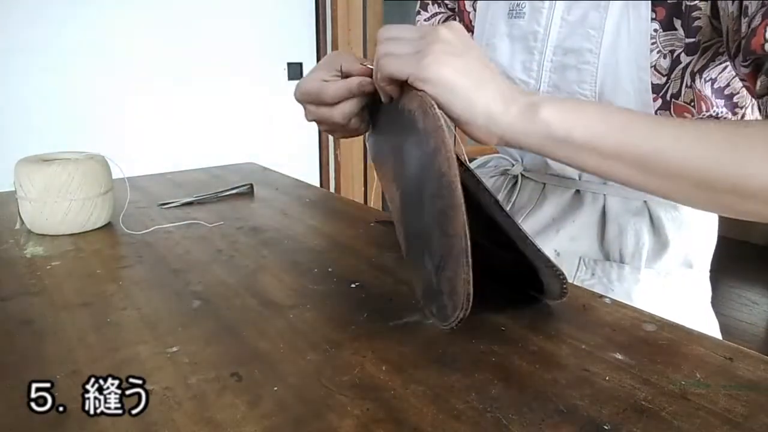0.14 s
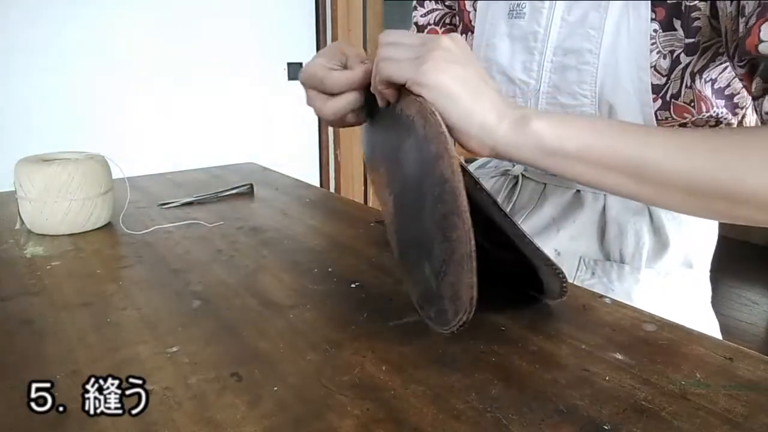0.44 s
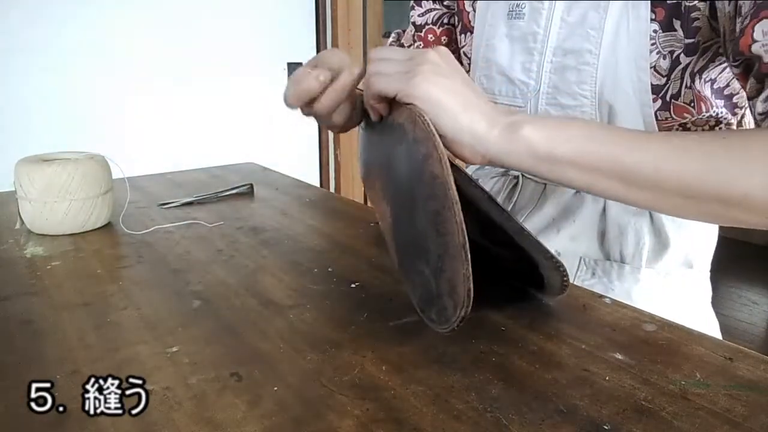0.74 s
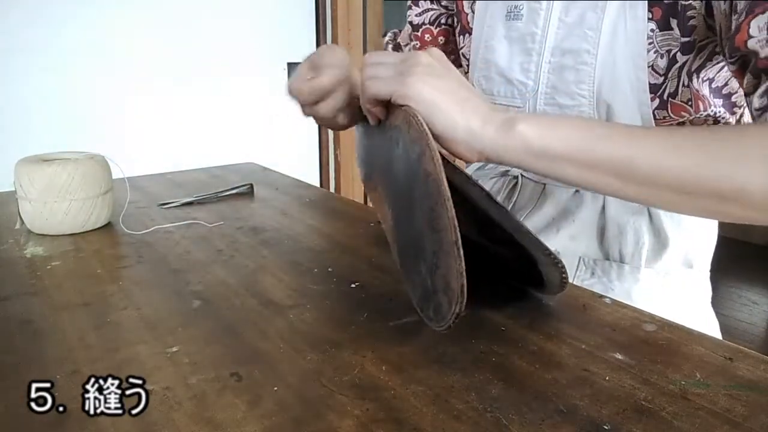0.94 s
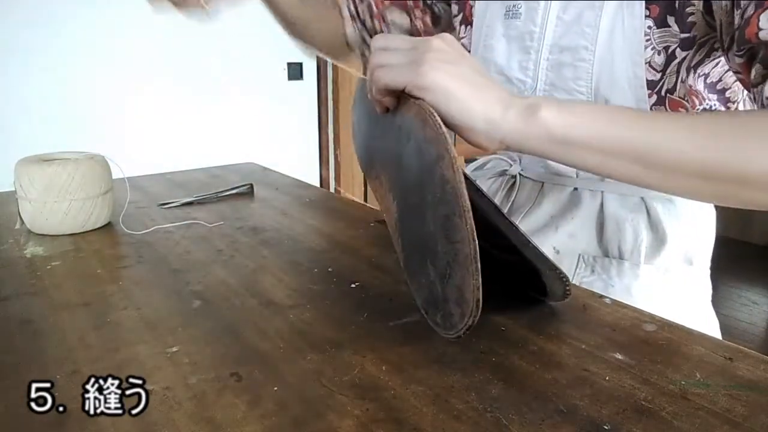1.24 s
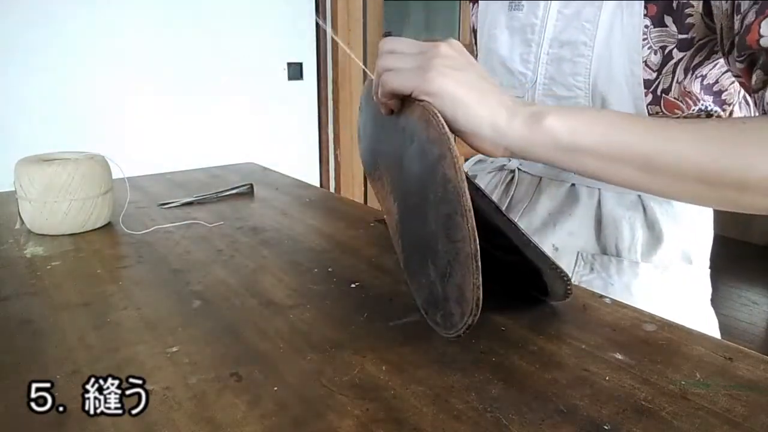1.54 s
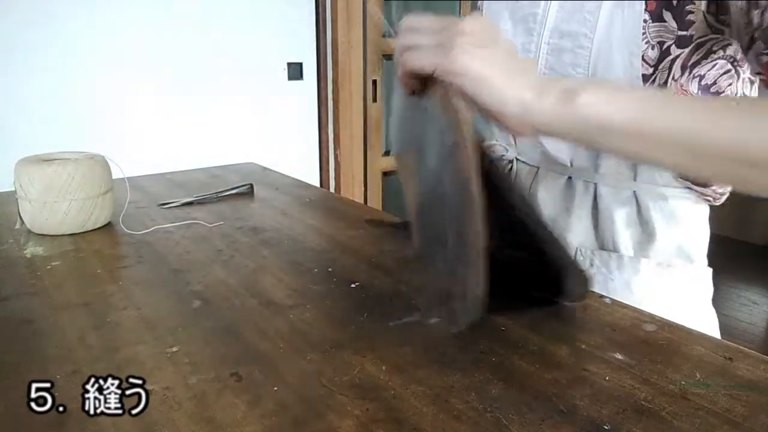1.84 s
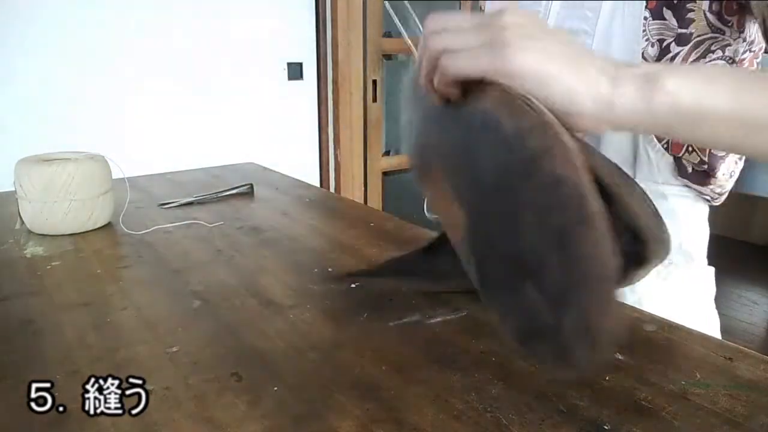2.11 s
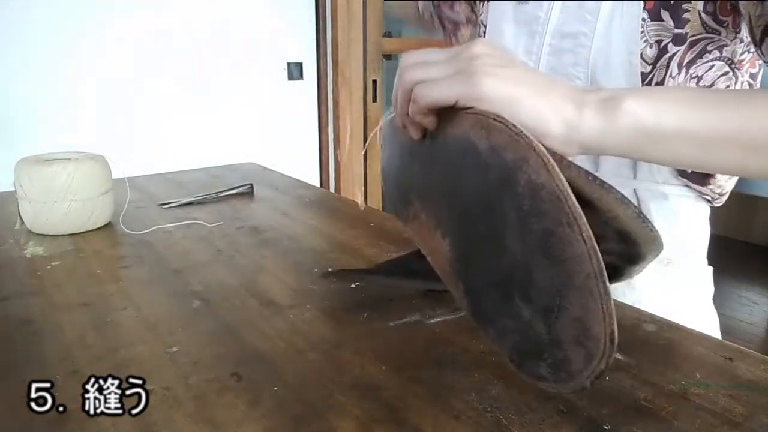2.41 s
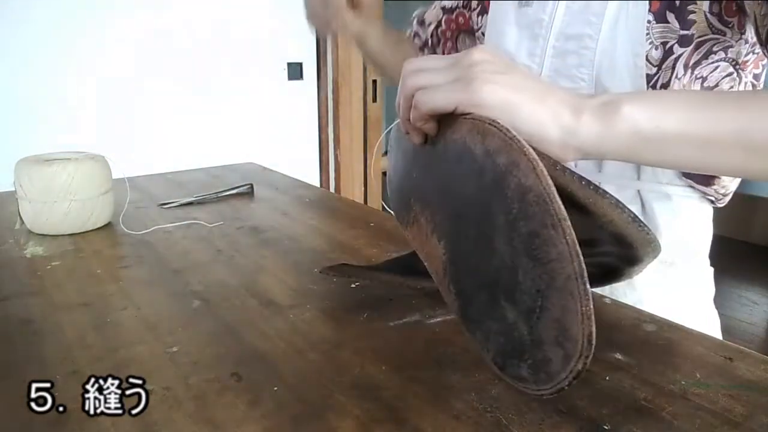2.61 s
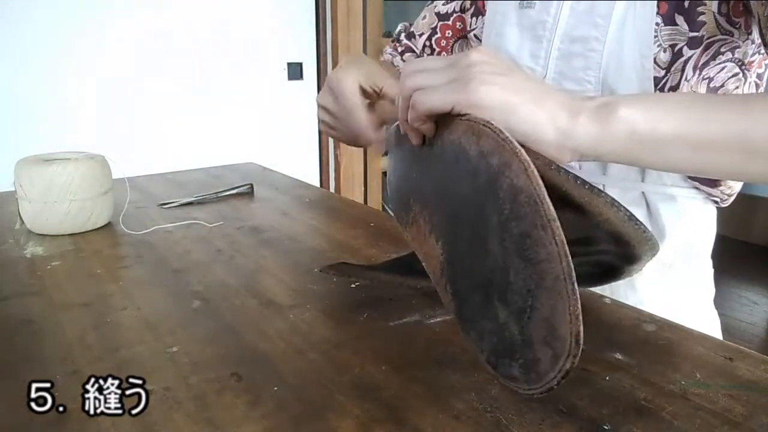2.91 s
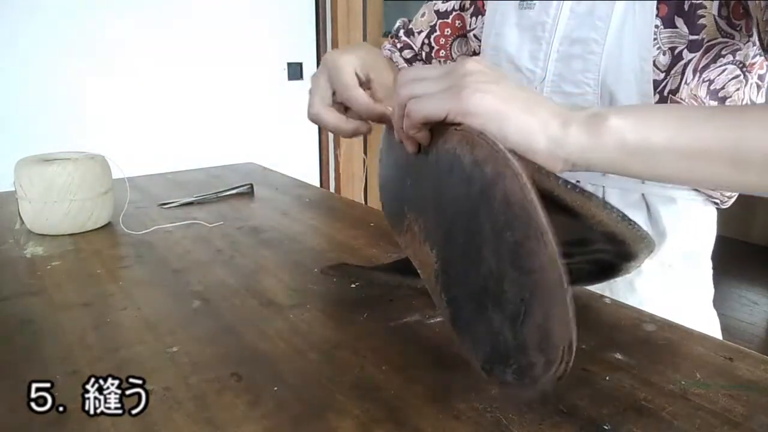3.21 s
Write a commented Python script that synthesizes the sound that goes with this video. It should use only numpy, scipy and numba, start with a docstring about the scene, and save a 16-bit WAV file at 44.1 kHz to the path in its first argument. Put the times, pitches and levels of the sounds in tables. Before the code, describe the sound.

A long thread hisses and rasps through leather after a brief needle scrape. The leather then scuffs and knocks on a wooden table, with small fingernail ticks, picked up in stereo in a small, quiet room.

```python
"""A long thread hisses and rasps through leather, stitched by hand at a wooden table in a small, quiet room.
The needle scrapes through the tight hole and ticks along with the fingernails. The piece scuffs over the
wood, crackles as it flexes, thumps the boards and clacks on them with its hard edge. A pair of microphones
takes it in with the room's short reverberation, the table's rumble under the hands and faint room tone."""
import sys
import numpy as np
from scipy import signal
from scipy.fft import rfft, irfft
from scipy.io import wavfile
from scipy.ndimage import uniform_filter1d
from numba import njit

SR = 44100
rng = np.random.default_rng(int(sys.argv[2]) if len(sys.argv) > 2 else 0)


def wrap_up_sound(samples):
    """Save the sound to the file named by the first command line argument, as 16-bit audio."""
    columns = np.atleast_2d(samples).T
    # keep every value between -1 and 1, then stretch to whole-number steps
    tamed = np.clip(columns, -1, 1)
    steps = np.round(tamed * 32767).astype(np.int16)
    wavfile.write(sys.argv[1], SR, steps)


N = 147735

# The empty room. Each row: frequency in Hz, relative level in dB.
ROOM_TONE_SPECTRUM = [(20, 1), (32, -12), (50, -0.5), (80, -24), (130, -17), (200, -30), (350, -23.5),
                      (520, -22.5), (800, -27.5), (1600, -31.5), (4000, -33), (8000, -32), (11000, -34),
                      (15500, -35.5)]
# The table under the working hands. Each row: frequency in Hz, relative level in dB.
RUMBLE_SPECTRUM = [(20, 7.5), (50, -4.5), (90, 6.5), (140, 1.5), (170, -4.5), (225, -5.5), (320, -11),
                   (420, -37.5), (900, -22.5)]
# That rumble rising and falling. Each row: time in seconds, level in dB.
RUMBLE_LEVELS = [(0, -55.5), (.25, -57.5), (.37, -53), (.6, -52.5), (.82, -57.5), (1.1, -52), (1.3, -48.5),
                 (1.55, -45.5), (1.68, -57.5), (1.95, -52), (2.18, -48), (2.35, -53.5), (2.8, -58.5),
                 (2.95, -49.5), (3.1, -54.5), (3.35, -48.5)]
# Leather bumping the table. Each row: time in seconds, level in dB, half width of the push in ms.
BUMPS = [(0.2809, -17, 1.29), (.372, -28.5, 2.15), (.510, -28.5, 1.56), (0.542, -21.5, 4.2),
         (0.625, -38, 0.94), (0.962, -23, 2.62), (1.018, -25.5, 1.41), (1.214, -43.5, 0.18),
         (1.292, -32.5, 1.94), (1.335, -32, 1.83), (1.447, -34.5, 1.2), (1.535, -30, 1.32),
         (2.2125, -17.5, 2.04), (2.895, -35, 1.9), (3.1855, -8.5, 0.37)]
# The table top's modes. Each row: frequency in Hz, level in dB, seconds to fall 60 dB.
TABLE_TOP_MODES = [(47.9, -21.5, 0.48), (73, -20, 0.15), (92.2, -8.5, 0.14), (114.5, -10, 0.11),
                   (136.4, 2.5, 0.13), (173, -9, 0.098), (199.5, -10, 0.18), (228.8, -11.5, 0.23),
                   (258, -21, 0.29), (286.5, -34.5, 0.37), (333, -26.5, 0.27), (460, -25, 0.12),
                   (525, -16.5, 0.062), (836, -2.5, 0.03)]
# Its crowded upper modes. Each row: frequency in Hz, relative level in dB.
UPPER_RING_SPECTRUM = [(100, -14), (230, 7), (400, -24.5), (470, -3), (600, 4.5), (660, -18), (760, -5),
                       (850, 4), (930, 2), (1000, -8), (1350, -1), (1600, -22), (4000, -46)]
# Needle, nails, tugged thread and stiff leather ticking.
# Each row: start in seconds, snap level in dB, body level in dB, body pitch in Hz, decay time in ms.
TICK_EVENTS = [(.281, -52.5, -49.5, 740, 4.2), (1.213, -53, -41, 238, 10), (2.056, -55, -44, 740, 3.5),
               (2.132, -50, -43, 900, 6), (2.2071, -39.5, -40.5, 2780, 1.5), (2.2165, -46, -48, 1200, 2.3),
               (2.3613, -49.5, -72, 1100, 2.3), (2.3763, -41.5, -36.5, 970, 3.7),
               (2.429, -50.5, -41.5, 920, 4.7), (2.8933, -44, -39, 910, 2.7), (2.96, -50.5, -48, 770, 11),
               (3.024, -44.5, -45.5, 8000, 4.7), (3.182, -47, -49, 4800, 3), (3.308, -41, -49, 800, 1.2),
               (3.3160, -41, -34, 4500, 1.3), (3.328, -35.5, -58, 800, 1.1)]
# A tick's bright snap. Each row: frequency in Hz, relative level in dB.
SNAP_SPECTRUM = [(400, -29), (1500, -7), (3000, 3), (5000, 7.5), (8000, 12), (11000, -8), (16000, -16)]
# Needle pushed through the leather.
# Each row: start and length in seconds, level in dB, squeak pitch in Hz, squeak against hiss in dB.
NEEDLE_SCRAPES = [(0.41, 0.091, -54.5, 5140, -3), (.472, 0.032, -56, 6800, -15),
                  (0.508, 0.041, -54.5, 3630, -3)]
# Thread running through the hole. Each row: time in seconds, level in dB.
PULL_LEVELS = [(.89, -67), (.94, -55.5), (.965, -51), (1.12, -53.5), (1.25, -50), (1.32, -46.5),
               (1.52, -48.5), (1.75, -48.5), (1.90, -52.5), (2.04, -54), (2.13, -69), (2.18, -74),
               (2.5, -61), (2.8, -86)]
# The thread running taut with a broad hiss. Each row: start and length in seconds, level in dB.
TAUT_TUG = [(1.93, 0.18, -52.5)]
# Fingers sliding on thread and needle. Each row: start and length in seconds, level in dB.
FINGER_SLIDES = [(2.93, 0.075, -60), (3.01, 0.064, -60.5), (3.28, 0.073, -51.5)]
# The hiss of the fibres. Each row: frequency in Hz, relative level in dB.
THREAD_SPECTRUM = [(200, 0), (700, 1), (950, -2.5), (1150, -4.5), (1600, -3), (2700, -3.5), (4200, -2),
                   (5500, -4), (6700, -0.5), (9500, -3), (10600, -7.5), (12200, -4.5), (14000, -18),
                   (16000, -28)]
# The rasp of the plies. Each row: centre in Hz, width in Hz, level against the pull in dB.
PLY_BANDS = [(3770, 1400, -9.5), (7920, 3800, -4)]
# Leather scuffing over the wood. Each row: start and length in seconds, level in dB.
SCUFF_STROKES = [(1.2, 0.76, -59.5), (1.76, 0.35, -53.5), (2.03, 0.13, -48.5), (2.17, 0.072, -51),
                 (2.23, 0.6, -57), (2.885, 0.16, -57.5), (3.10, 0.016, -53.5), (3.26, 0.094, -49)]
# The dull tone of a scuff. Each row: frequency in Hz, relative level in dB.
SCUFF_SPECTRUM = [(100, -3.5), (200, 5), (290, 9.5), (400, -2.5), (560, 7), (800, -2.5), (1200, -4.5),
                  (1700, -14), (3000, -11), (4000, -20), (8000, -14.5), (15000, -33)]
# Leather flexing in the hand. Each row: start and length in seconds, level in dB.
FLEXES = [(1.85, 0.23, -59), (2.38, 0.35, -62), (2.945, 0.052, -55.5), (3.10, 0.023, -56.5)]
# The dry tone of its crackle. Each row: frequency in Hz, relative level in dB.
RUSTLE_SPECTRUM = [(200, -18), (500, 1), (1100, 2.5), (1600, -1.5), (2500, -1), (4500, -13.5), (7500, -2.5),
                   (11000, -14.5), (16000, -20)]
# The hard edge striking wood. Each row: time in seconds, level in dB, half width of the push in ms.
EDGE_STRIKES = [(2.196, -45, 0.19), (2.2082, -33.5, 0.056), (2.2178, -39.5, .08), (3.187, -33.5, 0.13)]
# The stiff leather panel's modes. Each row: frequency in Hz, level in dB, seconds to fall 60 dB.
LEATHER_MODES = [(753, 0, 0.023), (884, -1, 0.027), (1373, -7, 0.031), (2720, -5, 0.016)]
# Balance of the microphone pair. Each row: frequency in Hz, left minus right in dB.
PAIR_BALANCE = [(30, -1), (70, -2.5), (130, -1.8), (300, -2.4), (520, 0.5), (1000, -2.5), (2000, -0.5),
                (4000, -2), (6300, -1.4), (8200, 2), (11000, -0.5), (15000, -.5)]

ROOM_T60_S, ROOM_GAP_S, WIDE_ABOVE_HZ = 0.38, 0.0038, 550
FIBRE_GRAIN = dict(per_s=5000, spread_db=3, flutter_db=2.65)  # shared by needle and thread


def undb(db):
    """Decibels to gain."""
    return 10 ** (np.asarray(db) / 20)


def unit(x):
    """Scale to rms 1."""
    return x / np.sqrt(np.mean(x ** 2))


def times():
    """Time of each sample in seconds."""
    return np.arange(N) / SR


def decay(t60_s):
    """Envelope that falls 60 dB in t60_s."""
    return np.exp(-np.log(1000) * times() / t60_s)


def curve(points):
    """Gain from (s, dB) points."""
    return undb(np.interp(times(), *np.array(points).T))


def strokes(rows):
    """Each stroke swells and fades as half a sine."""
    return sum(undb(db) * np.sin(np.pi * np.clip((times() - start) / length, 0, 1))
               for start, length, db in rows)


def spectrum_db(points, size):
    """Levels at the FFT bins, joining (Hz, dB) points over log frequency."""
    hz, db = np.array(points, float).T
    bins_hz = np.maximum(np.fft.rfftfreq(size, 1 / SR), 1)
    return np.interp(np.log(bins_hz), np.log(hz), db)


def colour(x, points, size=16384):
    """Causal filter through (Hz, dB) points that keeps the power of white noise."""
    cepstrum = irfft(np.log(unit(undb(spectrum_db(points, size)))))
    cepstrum[1:size // 2] *= 2  # fold to minimum phase
    cepstrum[size // 2 + 1:] = 0
    impulse = irfft(np.exp(rfft(cepstrum)))
    return signal.oaconvolve(x, np.array(impulse, ndmin=x.ndim), axes=-1)[..., :N]


@njit
def resonate(x, hz, width_hz):
    """State-variable band-pass with a centre for every sample."""
    y, band, low = np.empty(len(x)), 0., 0.
    for i in range(len(x)):
        g, damping = np.tan(np.pi * hz[i] / SR), width_hz / hz[i]
        v = (band + g * (x[i] - low)) / (1 + g * (g + damping))
        band, low, y[i] = 2 * v - band, low + 2 * g * v, damping * v
    return y


def bandpass(x, hz, width_hz):
    """Steep resonance whose centre may move, gain 1 at the centre."""
    centre = np.clip(hz * np.ones(N), 20, SR / 3)
    once = resonate(x + 1e-18, centre, float(width_hz))
    return resonate(once, centre, float(width_hz))


def wander(rate_hz):
    """Smooth random drift, rms 1."""
    hold = max(int(SR / rate_hz), 1)
    steps = rng.standard_normal(N)[np.arange(N) // hold]
    return unit(uniform_filter1d(steps, hold))


def friction(per_s, spread_db, flutter_db, flutter_hz):
    """Dense tiny catches of uneven size under a wavering pressure."""
    catches = (rng.random(N) < per_s / SR) * rng.choice([-1, 1], N)
    sizes = undb(spread_db * np.minimum(rng.exponential(size=N), 6))
    return unit(catches * sizes) * undb(flutter_db * wander(flutter_hz))


def pushes(rows):
    """Force of brief contacts: the longer the push, the duller the blow."""
    force = np.zeros(N)
    for when, db, width_ms in rows:
        push = np.exp(-.5 * ((times() - when) * 1000 / width_ms) ** 2)
        force -= undb(db) * push / push.sum()
    return force


def ringing(modes):
    """Decaying modes of a struck object."""
    return sum(undb(db) * np.sin(2 * np.pi * hz * times()) * decay(t60) for hz, db, t60 in modes)


def diffuse(bass_width=0.45):
    """Noise from all sides: alike at both microphones in the bass, unrelated in the treble."""
    mid, side = rng.standard_normal((2, N))
    hz = np.fft.rfftfreq(N, 1 / SR)
    width = bass_width + hz ** 2 / (hz ** 2 + WIDE_ABOVE_HZ ** 2) * (1 - bass_width)
    side = irfft(rfft(side) * width, N)
    return unit(np.array([mid + side, mid - side]))


def room(x, wet_db):
    """Direct sound plus a small room's reverberation; more wet_db sounds farther from the microphones."""
    tail = diffuse() * decay(ROOM_T60_S) * (times() > ROOM_GAP_S)
    tail /= np.sqrt(np.sum(tail ** 2) / 2)
    wet = signal.fftconvolve(x[None], tail, axes=1)[:, :N]
    return (x + undb(wet_db) * wet) / np.hypot(1, undb(wet_db))


def room_tone(level_db=-51):
    """Faint steady rumble and hiss all around the microphones."""
    return unit(colour(diffuse(), ROOM_TONE_SPECTRUM)) * undb(level_db)


def table(upper_db=-18, upper_t60_s=0.29, spread_s=0.0039):
    """The hands keep the table rumbling; soft bumps of the leather ring its modes."""
    upper = undb(upper_db) * unit(colour(rng.standard_normal(N), UPPER_RING_SPECTRUM)) * decay(upper_t60_s)
    onset = 1 - np.exp(-times() / spread_s)  # a blow takes time to spread through the boards
    response = (ringing(TABLE_TOP_MODES) + upper) * onset
    thumps = room(signal.fftconvolve(pushes(BUMPS), response)[:N], wet_db=-10.5)
    rumble = unit(colour(diffuse(), RUMBLE_SPECTRUM)) * curve(RUMBLE_LEVELS)
    return thumps + rumble


def ticks(band_ratio=1.36):
    """Each tick is a bright snap with a hollow ring whose pitch depends on where the leather is touched."""
    t = np.arange(SR // 8) / SR
    snap, body = np.zeros((2, N + len(t)))
    for start, snap_db, body_db, body_hz, decay_ms in TICK_EVENTS:
        fade = np.exp(-t * 1000 / decay_ms)
        span = slice(int(start * SR), int(start * SR) + len(t))
        hollow = signal.butter(2, [body_hz / band_ratio, body_hz * band_ratio], "band", fs=SR)
        crack, grain = rng.standard_normal((2, len(t)))
        snap[span] += undb(snap_db) * fade * crack
        body[span] += undb(body_db) * fade * unit(signal.lfilter(*hollow, grain))
    return room(colour(snap[:N], SNAP_SPECTRUM) + body[:N], wet_db=-1.5)


def needle():
    """The needle scrapes through the tight hole, each push with its own squeak under a bright hiss."""
    scrapes = np.zeros(N)
    for start, length, db, squeak_hz, squeak_db in NEEDLE_SCRAPES:
        rub = friction(**FIBRE_GRAIN, flutter_hz=69.3)
        squeak = undb(squeak_db) * unit(bandpass(rub, squeak_hz, width_hz=800))
        hiss = unit(bandpass(rub, hz=7600, width_hz=5700))
        scrapes += (squeak + hiss) * strokes([(start, length, db)])
    return room(scrapes, wet_db=0.5)


def thread(hiss_db=-4, rasp_drift=0.03):
    """Fibres hiss through the hole; twisted plies catch and rasp in two bands that drift with tension."""
    pull = curve(PULL_LEVELS) + strokes(FINGER_SLIDES)
    fibres = friction(**FIBRE_GRAIN, flutter_hz=70)
    hiss = colour(fibres * (undb(hiss_db) * pull + strokes(TAUT_TUG)), THREAD_SPECTRUM)
    plies = friction(per_s=900, spread_db=2.5, flutter_db=2.4, flutter_hz=45)
    tension = 1 + rasp_drift * wander(rate_hz=6.95)
    rasp = sum(undb(db) * unit(bandpass(plies, hz * tension, width)) for hz, width, db in PLY_BANDS)
    return room(hiss + rasp * pull, wet_db=3.5)


def scuffs():
    """Coarse, dull friction of the leather moving on the table."""
    rub = friction(per_s=1500, spread_db=2, flutter_db=2, flutter_hz=50) * strokes(SCUFF_STROKES)
    return room(colour(rub, SCUFF_SPECTRUM), wet_db=-1)


def rustles():
    """Dry, sparse crackle of the leather flexing in the hand."""
    crackle = friction(per_s=840, spread_db=4.5, flutter_db=2, flutter_hz=30) * strokes(FLEXES)
    return room(colour(crackle, RUSTLE_SPECTRUM), wet_db=-1)


def clacks():
    """The hard edge of the piece strikes the wood and the stiff panel rings briefly."""
    ring = signal.fftconvolve(pushes(EDGE_STRIKES), ringing(LEATHER_MODES))[:N]
    return room(ring, wet_db=-3.5)


def scene():
    """The work at the table and the room around it, as they reach the two microphones."""
    return thread() + needle() + scuffs() + rustles() + ticks() + clacks() + table() + room_tone()


def record(dry, top_hz=15800):
    """The right microphone gets more wood, the left more hiss near 8 kHz; the recorder cuts the top."""
    lean_db = spectrum_db(PAIR_BALANCE, 2 * N)
    mic_gains = undb(np.array([lean_db, -lean_db]) / 2)
    heard = irfft(rfft(dry, 2 * N) * mic_gains)[:, :N]
    steep_lowpass = signal.ellip(12, .1, 80, top_hz, fs=SR, output="sos")
    return signal.sosfilt(steep_lowpass, heard)


dry = scene()
out = record(dry)
wrap_up_sound(out)
```